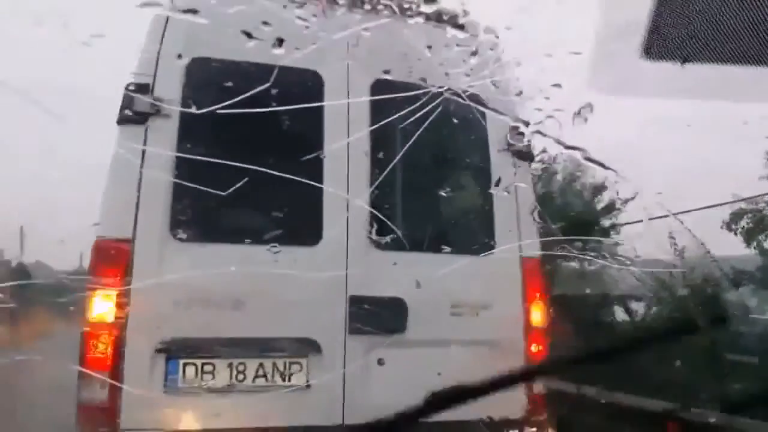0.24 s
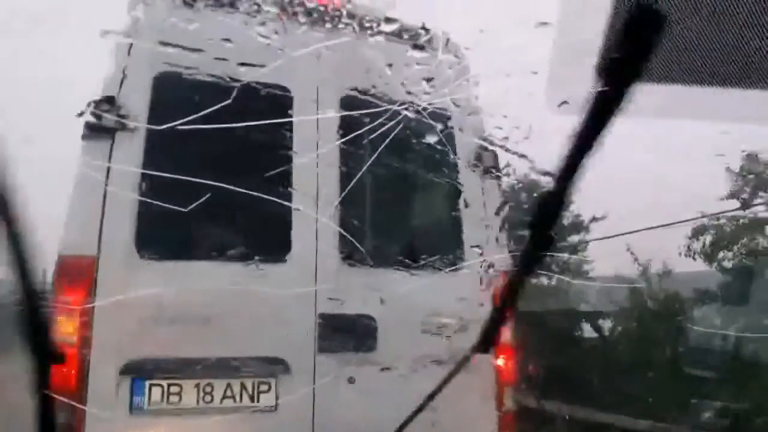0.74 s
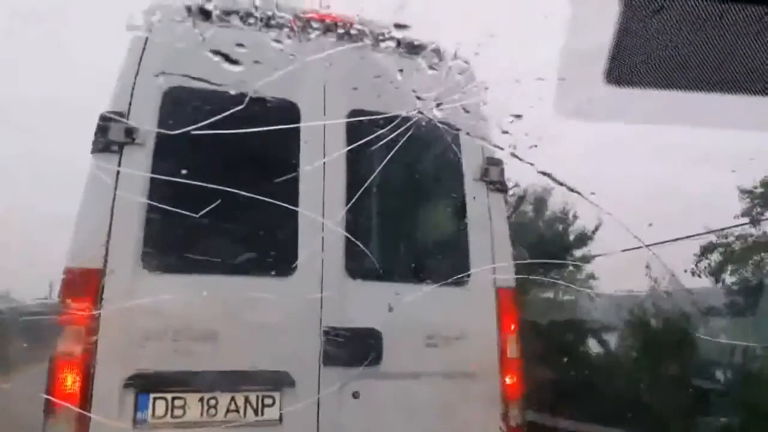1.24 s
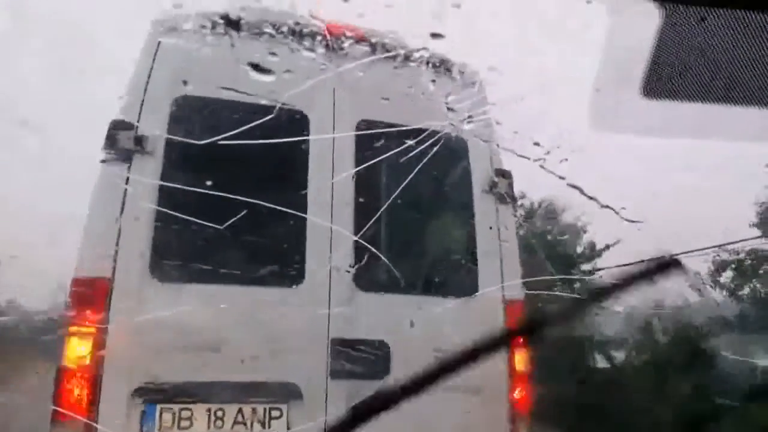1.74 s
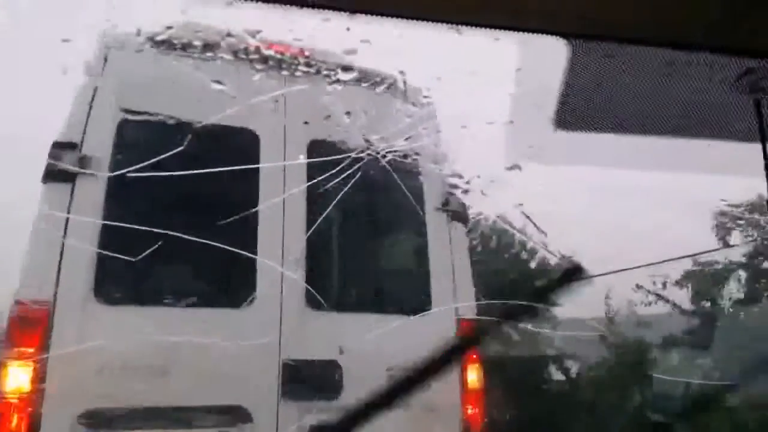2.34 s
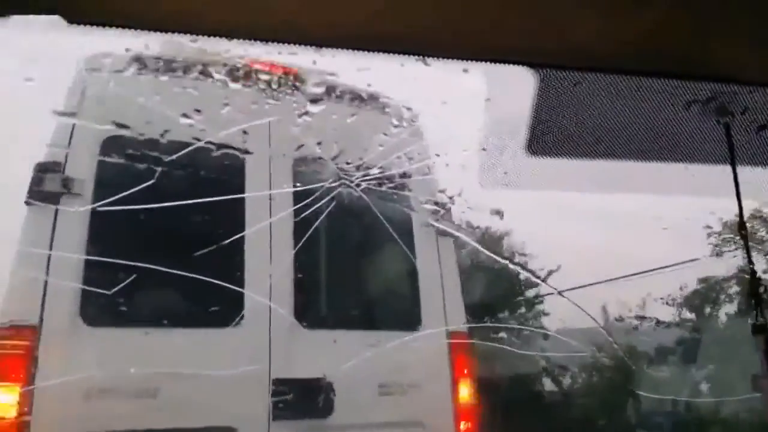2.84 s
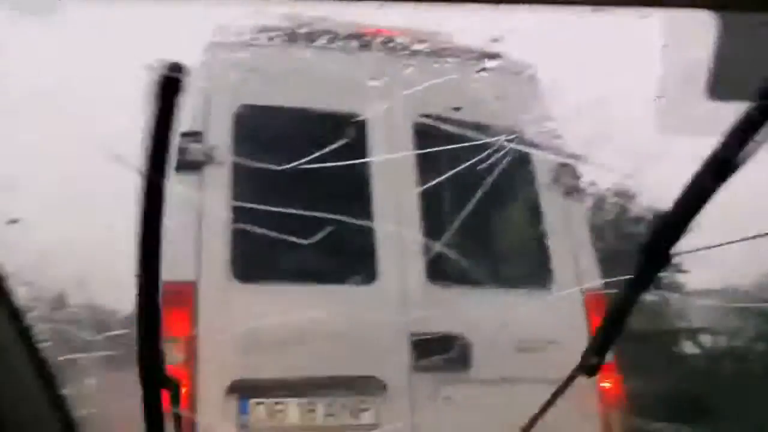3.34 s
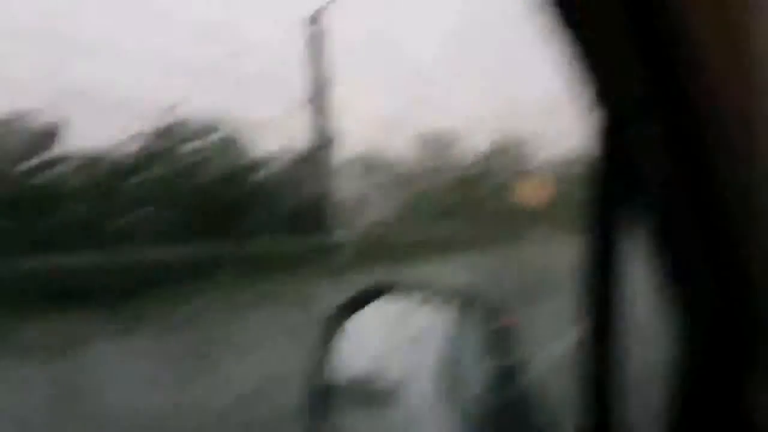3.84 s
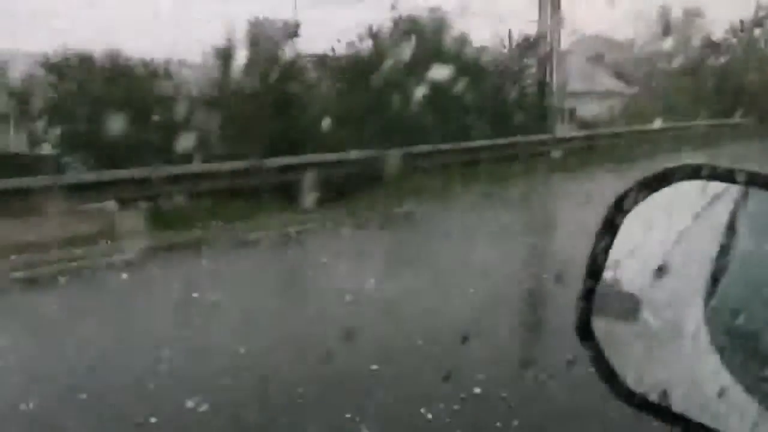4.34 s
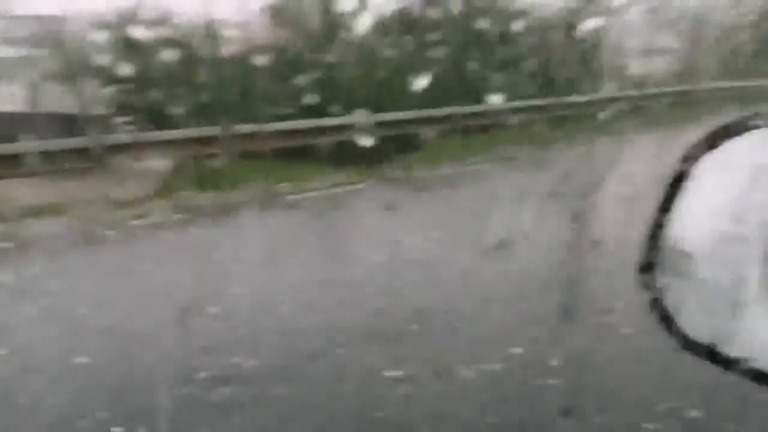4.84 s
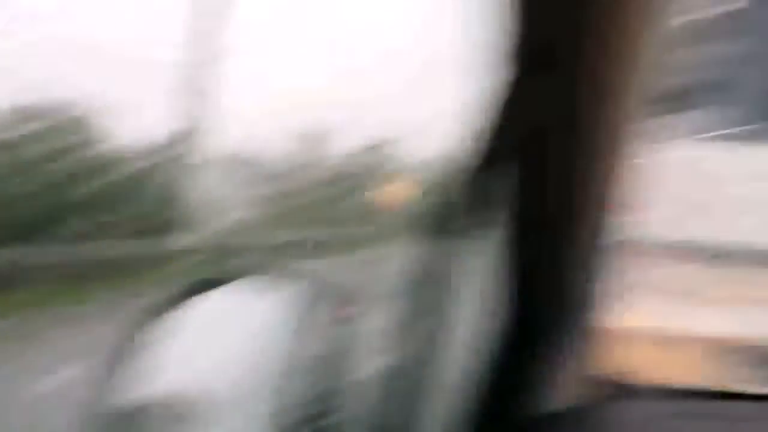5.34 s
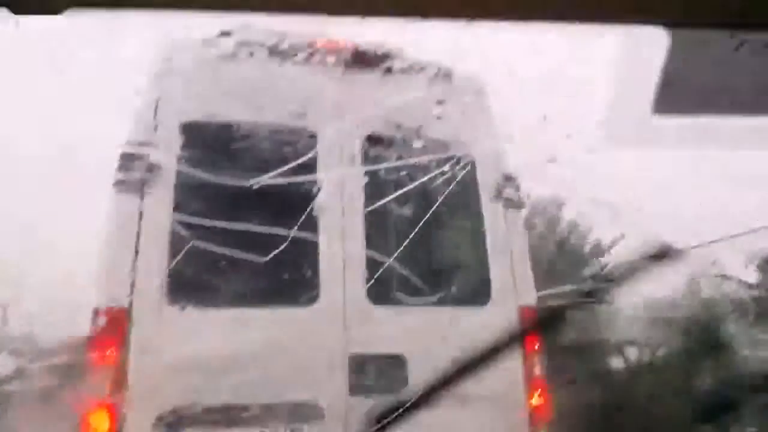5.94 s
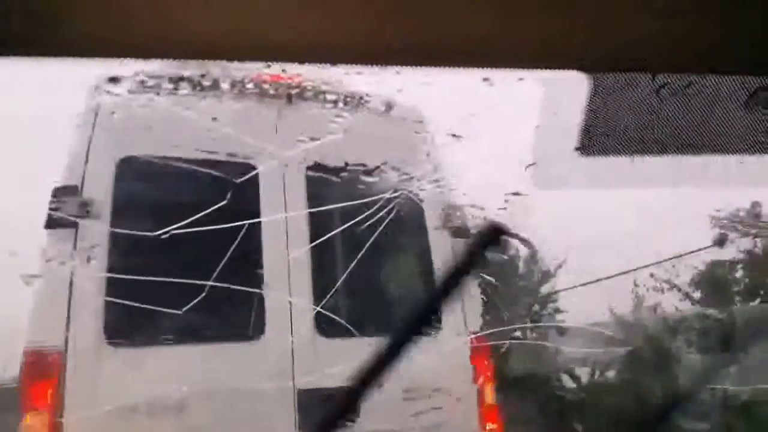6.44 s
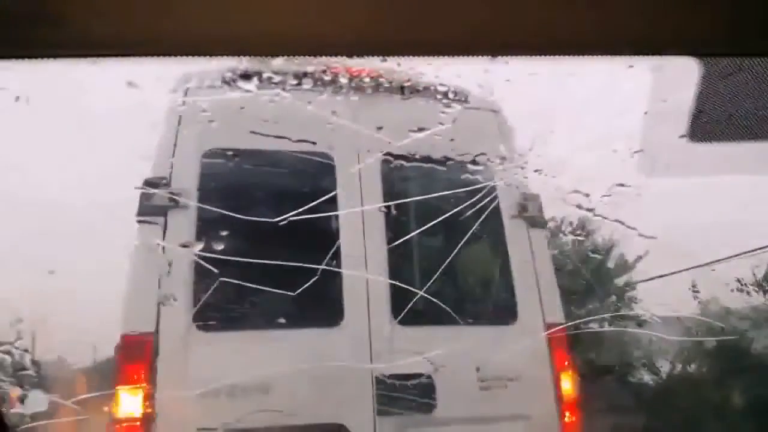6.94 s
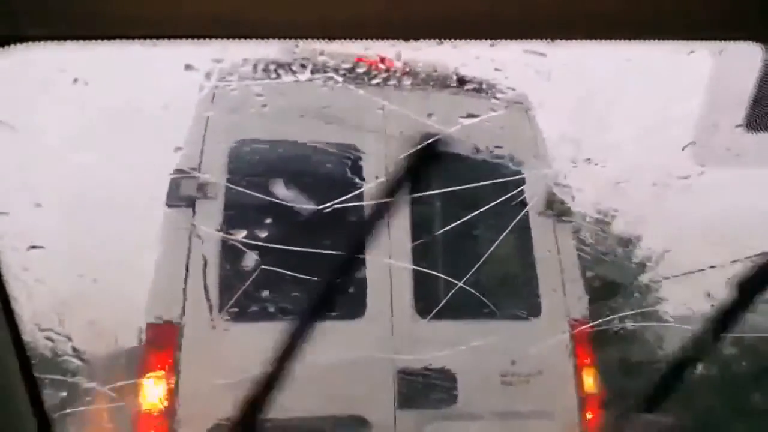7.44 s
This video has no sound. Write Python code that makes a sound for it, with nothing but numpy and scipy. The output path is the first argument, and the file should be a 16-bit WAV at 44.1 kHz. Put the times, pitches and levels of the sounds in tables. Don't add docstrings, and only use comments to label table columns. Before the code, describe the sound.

Inside a stopped car in a hailstorm, a massive boom and crack erupts almost immediately, its low body ringing under a second. Rain hisses and rumbles throughout, swelling and easing. Duller roof and trim knocks come around 0.5 s, then a heavy double roof thump near 1.0. Sharp glass cracks follow at 1.3, 1.4 and 1.8, a trim tap at 2.2, and a crack near 2.45. Small ticks and tocks fill the spaces. Blows land at 3.0 and 3.4, a door thump at 3.9, a strong booming pair near 4.2, and a hard crack at 4.55. Low, resonant door thumps cluster around 5.1, then a bright crack at 5.5. Mixed thuds and shatters follow from 6.1 to 6.8, and a dense run of cracks, ticks and a deep boom at 7.0-7.45, with rain surging near 7.3. Peaks saturate; the background dips before blows and recovers afterwards.

```python
import sys
import numpy as np
from scipy import signal
from scipy.io import wavfile

SR = 44100
rng = np.random.default_rng(int(sys.argv[2]) if len(sys.argv) > 2 else 0)


def magnitude_from_level(level_db):
    exponent = np.asarray(level_db, float) / 20
    return 10 ** exponent


def master_out(mix):
    frames = np.transpose(np.atleast_2d(mix))
    ceiling = np.clip(frames, -1, 1)
    pcm = np.round(ceiling * 32767).astype(np.int16)
    wavfile.write(sys.argv[1], SR, pcm)


N = 338688
STEP = 16

# start_s, crack_level_db, knock_level_db, boom_level_db, ring_length_factor
GLASS_BLOWS = [(0.0326, 2, -4.5, -5, 0.59), (0.4349, -12, -13.5, -18, 1.6), (1.3054, -7, -12, -17, 2.21),
               (1.4237, 0.8, -13.5, -14, 0.65), (1.8125, -2.5, -10.5, -14.5, 1.44),
               (2.4496, -0.5, -11, -17.5, 0.64), (2.4755, -11, -15, -24.5, 0.75),
               (2.9901, -10.5, -8.5, -16.5, 1.57), (3.3762, -4, -9.5, -16, 0.73),
               (4.1624, -1, -12.5, -7.5, 0.88), (4.1986, -4.5, -12.5, -7, 0.62),
               (4.5627, 1, -13.5, -13.5, 0.64), (4.6671, -11, -22, -14.5, 0.64),
               (5.5268, 0, -14, -27.5, 0.69), (6.1160, -10.5, -10, -16.5, 2.5),
               (6.4444, -5.5, -9.5, -14, 1.87), (6.735, -7.5, -12, -17, 1.6),
               (7.1571, -7.5, -11.5, -19.5, 2.35), (7.2350, -1.5, -9.5, -5.5, 0.79),
               (7.359, -7, -16, -26, 0.57), (7.4136, 1.5, -13, -15.5, 0.61)]
# start_s, crack_level_db, knock_level_db, boom_level_db, ring_length_factor
ROOF_BLOWS = [(0.2937, -26.5, -34.5, -35.5, 3.6), (0.5132, -25, -14.5, -13.5, 0.64),
              (0.5496, -36.5, -17.5, -24.5, 1.13), (0.5911, -21.5, -26.5, -21, 0.91),
              (0.9708, -11, -8.5, -7.5, 0.73), (1.009, -17.5, -13, -16.5, 1.76),
              (1.7516, -42, -31, -26, 1.1), (1.8702, -32.5, -11.5, -13.5, 2.36),
              (2.2278, -39, -24.5, -24.5, 0.58), (2.7900, -25.5, -10.5, -18, 1.06),
              (3.928, -25, -24, -37, 1.6), (4.4947, -44.5, -32, -38, 0.88),
              (4.7961, -29, -30.5, -25.5, 0.67), (5.0752, -36.5, -27.5, -25.5, 1.7),
              (5.1217, -23.5, -12.5, -30, 1.19), (5.1686, -30.5, -19.5, -26, 0.42),
              (6.149, -21, -9, -16.5, 1.5), (6.2611, -27, -18, -25.5, 0.35),
              (6.7989, -37.5, -14, -14, 1.87)]
# frequency_hz, level_db (per Hz)
PANEL_RESPONSE = [(18, -49), (30, -18.5), (59, -11.5), (113, 5.5), (240, -2.5), (273, -2), (535, -5),
                  (695, -9), (918, -13.5), (1250, -11), (1500, -15.5), (1950, -58), (3300, -120)]
# frequency_hz, level_db (per Hz)
ICE_SPECTRUM = [(500, -12), (1000, -5), (1800, -8.5), (2600, -13), (3600, -11), (5200, -15), (6200, -21.5),
                (7400, -23)]
# frequency_hz, t60_s
RING_TIME = [(60, 0.61), (160, 0.54), (420, 0.35), (1100, 0.17), (2900, .11), (7000, 0.086)]
# start_s, peak_level_db, pitch_hz
WINDSCREEN_TICKS = [(0.123, -18.5, 4090), (0.33, -23, 4240), (0.771, -20, 5100), (1.651, -19.5, 4900),
                    (2.095, -22, 4770), (2.343, -25, 4730), (2.553, -25.5, 4840), (2.612, -22, 4070),
                    (2.6526, -25, 4980), (2.697, -20.5, 4400), (3.1563, -22.5, 3680), (3.5376, -23.5, 4600),
                    (3.624, -23.5, 4750), (3.9583, -21, 4640), (4.068, -25, 4330), (4.1329, -9, 4340),
                    (4.3486, -24, 3860), (4.8, -15, 4260), (4.855, -25, 4030), (4.907, -19.5, 3820),
                    (4.956, -26.5, 3830), (5.4016, -23, 4630), (5.671, -15, 4680), (5.7388, -18, 4440),
                    (5.8792, -22.5, 4520), (7.058, -8.5, 4170), (7.2809, -28.5, 4620),
                    (7.4807, -28.5, 4810), (7.5533, -31.5, 3760)]
# start_s, peak_level_db, pitch_hz
BONNET_TOCKS = [(0.1709, -32, 2070), (0.772, -17.5, 1700), (7.39, -18, 2100), (0.81, -24, 2210),
                (0.8563, -22.5, 2520), (1.1453, -18.5, 2550), (2.09, -22, 2400), (2.1786, -19.5, 2940),
                (2.6385, -18.5, 2460), (2.7562, -20, 3460), (2.96, -21, 2880), (3.472, -16, 3390),
                (4.3216, -29.5, 3220), (5.1994, -25, 2400), (5.789, -24, 2260), (5.9337, -19.5, 2340),
                (6.6167, -23.5, 2470), (6.715, -15.5, 2000), (6.8494, -28, 2070), (6.9763, -18, 3040),
                (7.0344, -18, 3420), (7.1236, -15, 2360), (7.329, -19.5, 2870), (7.618, -27, 3280)]
# start_s, peak_level_db, pitch_hz, left_right_db, t60_s
TRIM_TAPS = [
    (0.5444, -6.5, 980, -9, 0.15),
    (1.7509, -35, 1270, 0, 0.12),
    (2.227, -7.5, 1090, 2, 0.12),
    (4.4942, -28, 1410, -3.0, 0.12),
    (5.818, -14.5, 1340, -4.5, 0.079),
    (5.9693, -19.5, 1130, -11, 0.074),
]
# start_s, peak_level_db, pitch_hz, t60_s
DOOR_THUMPS = [
    (3.924, -8.5, 298, 0.38),
    (3.963, -24.5, 406, 0.5),
    (5.076, -18, 242, 0.5),
    (5.118, 0.5, 238, 0.51),
    (5.169, -10, 240, 0.55),
    (6.169, -10.5, 371, 0.42),
    (6.499, -6, 288, 0.94),
]
# time_s, level_db
RAIN_STRENGTH = [(0.0, 6.5), (0.4, -4), (1.1, 0.2), (1.6, -8), (2.1, 3.5), (2.33, -2.5), (2.8, 0.5),
                 (3.2, -1), (3.53, 6), (3.75, -2), (5.0, -0.6), (5.55, -4), (5.8, 6.5), (6.05, -3.5),
                 (6.6, -1), (7.05, 0), (7.3, 9.5), (7.68, 0)]
# frequency_hz, level_db (per Hz)
RAIN_SPECTRUM = [(15, -44), (25, -8), (60, -17), (109, -3.5), (282, -5.5), (342, -8.5), (714, -13.5),
                 (785, -15.5), (1230, -18), (2830, -28), (4890, -26.5), (6830, -41), (7330, -8),
                 (9530, -52), (16100, -120)]
# frequency_hz, left_right_likeness (0-1)
COHERENCE = [(25, .8), (60, .97), (150, .94), (300, .88), (600, .72), (1500, .45), (3000, .3), (6000, .3)]
# frequency_hz, left_right_db
PORT_BALANCE = [(60, 0), (500, -1), (1400, -4), (2400, -1.1), (4000, 4), (5500, 2.5), (7000, -1.1)]
# start_s, end_s, extra_treble_cut_db, overall_cut_db
GAIN_GAPS = [
    (0.015, 0.031, 5, 30),
    (0.398, 0.42, 23, 1.2),
    (4.11, 4.126, 6, 2.5),
    (4.534, 4.555, 20, 32),
    (4.784, 4.797, 5, -9),
]

GLASS_HOLD_S, ROOF_HOLD_S, HOLD_S_PER_DB, SOFT_KNOCK_DB = 0.0068, 0.0074, 0.0031, -21.5
SHUDDER_DB, SHUDDER_LENGTH = -8, 2.08
FORERUN_S = 0.0077
PELLET_T60_S, TICK_PAN_DB, TOCK_PAN_DB = 0.079, 3.5, 2.5
RUMBLE_DB, RUMBLE_FOLLOWS, HISS_DB = -28.5, 0.63, -47.5
DROPS_PER_S, DROP_T60_S = 45, 0.035
DUCK_FROM_S, DUCK_ONSET_S, DUCK_TO_S, BUSY_S = 0.019, 0.0086, 0.0065, 0.1
DUCK_DB, DUCK_SHARE, DUCK_OVERALL_DB = 14, 0.4, 1
PELLET_DUCK_FROM_DB = -29.5
RECOVER_FROM_DB, RECOVER_SHARE, RELEASE_DB_S = -25.5, 0.87, 200.5
LEFT_LAG_S = 0.00042
CUTOFF_HZ = 7750
OPPOSITE = np.array([[1], [-1]])


def stones():
    blows = []
    for s, crack_db, knock_db, boom_db, length in GLASS_BLOWS:
        blows.append((s, crack_db, knock_db, boom_db, GLASS_HOLD_S, length))
    for s, crack_db, knock_db, boom_db, length in ROOF_BLOWS:
        contact_s = ROOF_HOLD_S + HOLD_S_PER_DB * max(knock_db - SOFT_KNOCK_DB, 0)
        blows.append((s, crack_db, knock_db, boom_db, contact_s, length))
    return sorted(blows)


def panel_boom():
    slow, count = 16, 170
    hz = 30 + 850 * np.linspace(0, 1, count) ** 1.5 * (1 + .01 * rng.standard_normal(count))
    share = magnitude_from_level(at_hz(PANEL_RESPONSE, hz)) * np.sqrt(np.abs(np.gradient(np.sort(hz))) + 1)
    alike = np.clip(at_hz(COHERENCE, hz), 0, 1)
    out = np.zeros((2, N // slow + SR // slow + 1))
    t = np.arange(SR // slow * 3 // 4) * slow / SR
    swell = 1 - np.exp(-np.outer(hz / 0.35, t))
    angle = 2 * np.pi * np.outer(hz, t)
    sines, cosines = swell * np.sin(angle), swell * np.cos(angle)
    for at, crack_db, knock_db, boom_db, hold_s, length in stones():
        mid, side, spread, phase = rng.standard_normal((4, count))
        t60 = length * at_hz(RING_TIME, hz) * magnitude_from_level(1.75 * spread)
        dying = np.exp(np.outer(-np.log(1000) / t60, np.maximum(t - hold_s, 0)).astype(np.float32))
        upper_db = 1.163 * knock_db + 0.14 * crack_db + 10
        blow_spectrum = [(110, boom_db + 5), (330, knock_db + 6.5), (850, upper_db)]
        strength = rms_one(share) * magnitude_from_level(at_hz(blow_spectrum, hz))
        common = np.sqrt(1 + alike) * np.tanh(2 * mid)
        weights = strength * (common + np.sqrt(1 - alike) * side * OPPOSITE)
        ringing = weights * np.cos(4 * phase) @ (dying * sines)
        ringing += weights * np.sin(4 * phase) @ (dying * cosines)
        start = round(at * SR / slow)
        out[:, start:start + len(t)] += ringing / np.sqrt(count)
    return signal.resample_poly(out, slow, 1, axis=1)[:, :N]


def shell_shudder(power, hz):
    for at, _, _, boom_db, hold_s, length in stones():
        level_db = boom_db + SHUDDER_DB + 13 + at_hz(RAIN_SPECTRUM, hz)
        add(power, at, level_db, SHUDDER_LENGTH * length * at_hz(RING_TIME, hz), hold_s, 0, .02)


def ice_crack(power, forerunner, hz):
    for at, crack_db, knock_db, _, hold_s, length in stones():
        low_db = 0.88 * knock_db + 0.17 * crack_db + 15
        middle_db = 0.59 * knock_db + 0.46 * crack_db + 16
        blow_spectrum = [(700, low_db), (1600, middle_db), (3500, crack_db + 13)]
        level_db = at_hz(blow_spectrum, hz) + at_hz(ICE_SPECTRUM, hz)
        t60, hold_s = length * at_hz(RING_TIME, hz), max(hold_s, 0)
        add(power, at, level_db, t60, hold_s * (hz / 1000) ** -.3, 0, .002)
        add(power, at, level_db - 28.5, 3.8 * t60, hold_s, 0, .004)
        add(forerunner, at - FORERUN_S, level_db - 21, .004, FORERUN_S, 0, .004)


def pellets():
    ticks = [(*row, TICK_PAN_DB, PELLET_T60_S) for row in WINDSCREEN_TICKS]
    tocks = [(*row, TOCK_PAN_DB, PELLET_T60_S) for row in BONNET_TOCKS]
    return ticks + tocks + list(TRIM_TAPS)


def pellet_taps(power, hz):
    for at, peak_db, pitch_hz, pan_db, t60 in pellets():
        level_db = peak_db - 4.0 - 9 * np.log2(hz / pitch_hz) ** 2
        pan_db = np.clip(pan_db - 2.0, -8, 8)
        add(power, at, level_db, t60 * (hz / 3000) ** -.3, .003, pan_db, .0008)


def door_thumps(power, hz):
    for at, peak_db, pitch_hz, t60 in DOOR_THUMPS:
        add(power, at, peak_db + 8.5 - 16 * np.log2(hz / pitch_hz) ** 2, t60, .02, 0, .006)


def raindrops(count):
    born = rng.random(count) < DROPS_PER_S * STEP / SR
    decay = magnitude_from_level(-120 * STEP / SR / DROP_T60_S)
    power = signal.lfilter([1], [1, -decay], born * rng.exponential(1, count) ** 2)
    return power / power.mean()


def rain(t, hz, treble, drops, flicker, after_db):
    s, strength_db = np.transpose(RAIN_STRENGTH)
    rumble_db = RUMBLE_DB + RUMBLE_FOLLOWS * strength_db + 13
    hiss_db = HISS_DB + strength_db + 31.5
    storm_db = np.interp(t, s, (1 - treble) * rumble_db + treble * hiss_db)
    patter_db = 0.73 * flicker + (1.6 + 2.46 * treble * (hz / 3000) ** 0.3) * drift(20)
    level_db = storm_db + patter_db + at_hz(RAIN_SPECTRUM, hz) - after_db
    return np.tile(magnitude_from_level(level_db) ** 2 * (1 + 0.17 * treble * drops), (2, 1))


def crackle_and_rain():
    samples, grid = np.arange(float(N)), np.arange(N // STEP + 1) * float(STEP)
    t = grid / SR
    out, drops, flicker = np.zeros((2, N)), raindrops(count=len(grid)), drift(30)
    duck_db, _, after_db = ducking(t)
    for hz, noise in stereo_bands():
        treble = np.clip(np.log2(hz / 500) / 1.42, 0, 1)
        power = rain(t, hz, treble, drops, flicker, after_db)
        door_thumps(power, hz)
        if hz < 600:
            shell_shudder(power, hz)
        if hz > 600:
            pellet_taps(power, hz)
            forerunner = np.zeros_like(power)
            ice_crack(power, forerunner, hz)
            power = power * magnitude_from_level(-2 * duck_db * (hz / 3600) ** .3) + forerunner
            power = power * magnitude_from_level(2 * 2.34 * drift(90))
        out += noise * [np.interp(samples, grid, np.sqrt(p)) for p in power]
    return out


def add(power, s, level_db, t60, hold_s, pan_db, rise_s):
    start = max(round(s * SR / STEP), 0)
    count = min(int((hold_s + t60) * SR / STEP) + 2, power.shape[1] - start)
    t = np.arange(count) * STEP / SR
    shape = (1 - np.exp(-t / rise_s)) * magnitude_from_level(level_db - 60 * np.maximum(t - hold_s, 0) / t60)
    power[:, start:start + len(t)] += (shape * magnitude_from_level(pan_db / 2 * OPPOSITE)) ** 2


def stereo_bands():
    edges = 7680 / 2 ** np.r_[8.5:3.5:-.5, 3.5:-.1:-1 / 3.43]
    white = rng.standard_normal((2, 2, N))
    for k, (low, high) in enumerate(zip(edges, edges[1:])):
        band = signal.butter(2, [low, high], "band", fs=SR, output="sos")
        mid, side = signal.sosfilt(band, white[k % 2])
        hz = np.sqrt(low * high)
        alike = np.clip(at_hz(COHERENCE, hz), 0, 1)
        left, right = np.sqrt(1 + alike) * mid + np.sqrt(1 - alike) * side * OPPOSITE
        lag = round(LEFT_LAG_S * SR) if hz > 950 else 0
        yield hz, np.array([np.roll(left, lag), right]) * magnitude_from_level(at_hz(PORT_BALANCE, hz) / 2 * OPPOSITE)


def drift(rate):
    r = np.exp(-2 * np.pi * STEP * rate / SR)
    chance = rng.standard_normal(N // STEP + 4001)
    return rms_one(signal.lfilter([1], [1, -2 * r, r * r], chance)[4000:])


def rms_one(x):
    return x / np.sqrt(np.mean(x ** 2) + 1e-20)


def at_hz(points, hz):
    return np.interp(np.log(hz), np.log(np.array(points)[:, 0]), np.array(points)[:, 1])


def ducking(t):
    treble_db, overall_db, after_db = np.zeros((3, len(t)))
    gaps, last = list(GAIN_GAPS), -1
    for at, crack_db, *_ in stones():
        if at - last > BUSY_S:
            cut_db = max(DUCK_DB + DUCK_SHARE * crack_db, 0)
            gaps.append((at - DUCK_FROM_S, at - DUCK_TO_S, cut_db, DUCK_OVERALL_DB))
        last = at
        depth_db = RECOVER_SHARE * (crack_db - RECOVER_FROM_DB)
        after_db = np.maximum(after_db, (t > at) * (depth_db - RELEASE_DB_S * (t - at)))
    for at, peak_db, _ in WINDSCREEN_TICKS:
        cut_db = DUCK_SHARE * max(peak_db - PELLET_DUCK_FROM_DB, 0)
        gaps.append((at - DUCK_FROM_S, at - .002, cut_db, 0))
    for start, end, treble_cut_db, overall_cut_db in gaps:
        shape = np.clip(np.minimum((t - start) / DUCK_ONSET_S, (end - t) / 0.0014), 0, 1)
        treble_db = treble_db + treble_cut_db * shape
        overall_db = overall_db + overall_cut_db * shape
    return treble_db, overall_db, after_db


def scene():
    overall_db = ducking(np.arange(0, N, STEP) / SR)[1]
    gain = magnitude_from_level(-np.repeat(overall_db, STEP)[:N])
    return gain * (panel_boom() + crackle_and_rain())


def roll_off(x):
    return signal.sosfilt(signal.butter(12, 7480, fs=SR, output="sos"), x)


def record(dry):
    rounded = 1.038 * np.tanh(dry / 1.208)
    steep = signal.cheby2(20, 70, CUTOFF_HZ, fs=SR, output="sos")
    mix = np.clip(signal.sosfilt(steep, rounded), -.99, .99)
    return roll_off(mix)


dry = scene()
out = record(dry)
master_out(out)
```